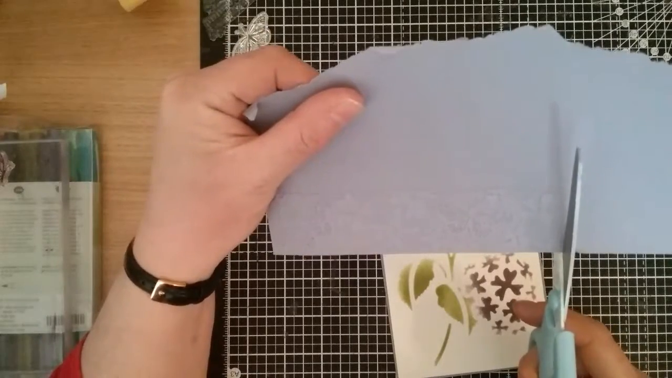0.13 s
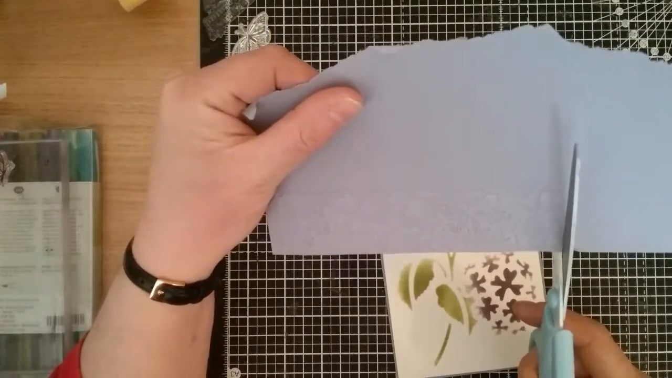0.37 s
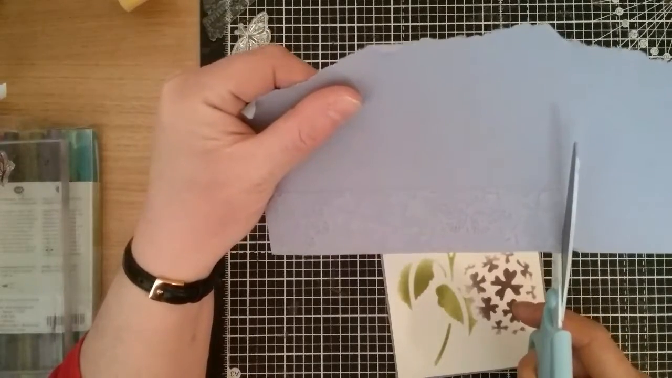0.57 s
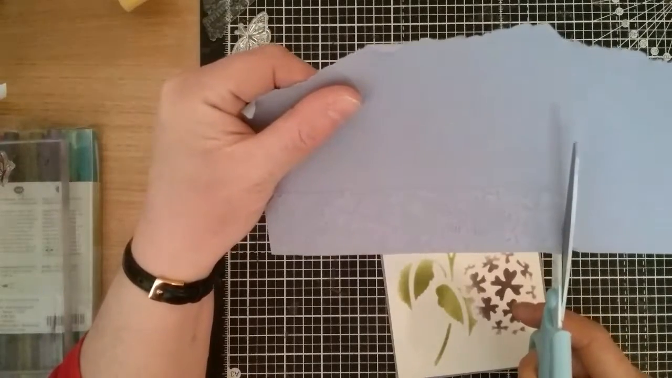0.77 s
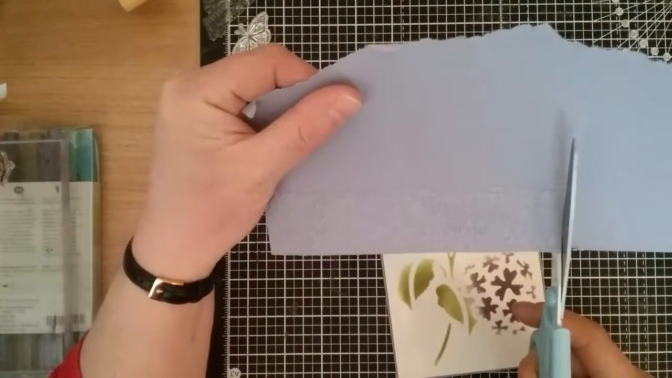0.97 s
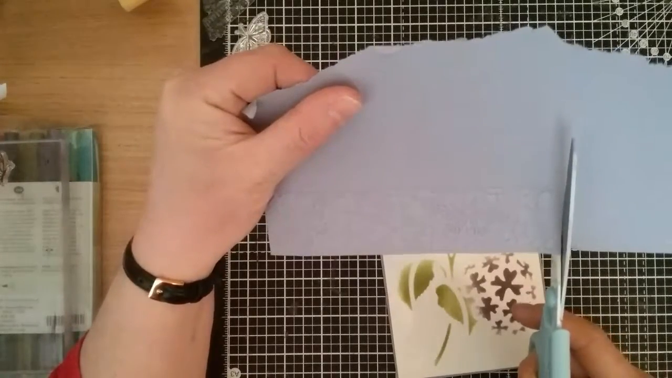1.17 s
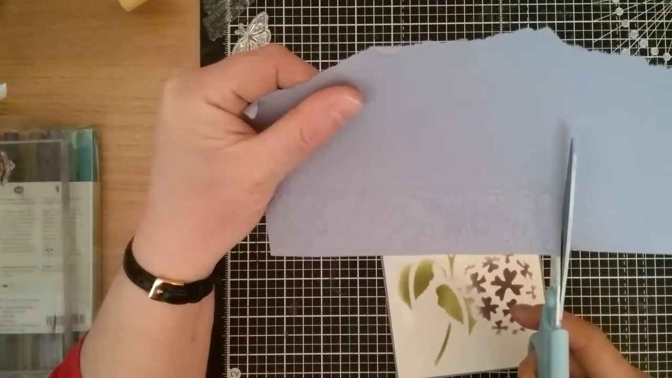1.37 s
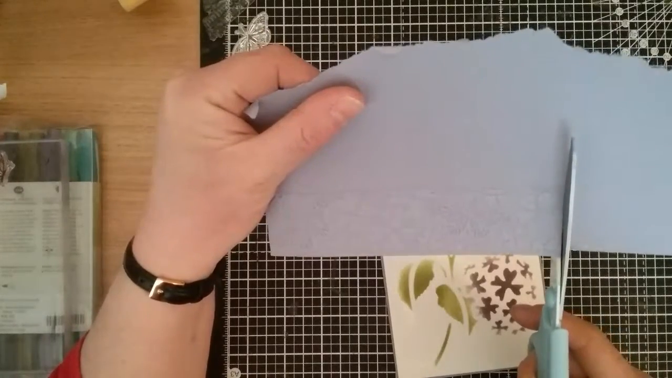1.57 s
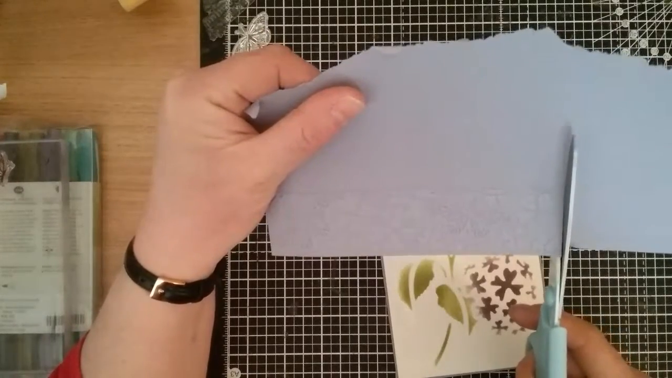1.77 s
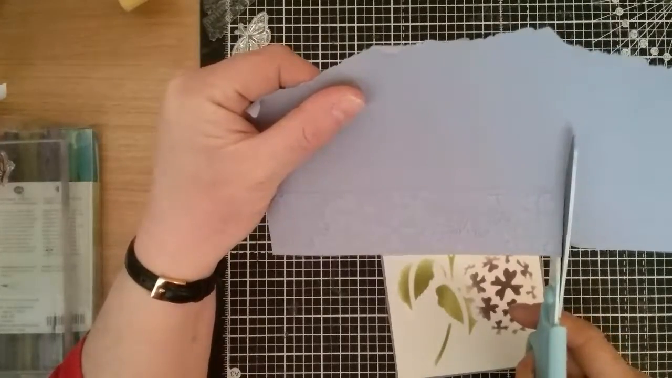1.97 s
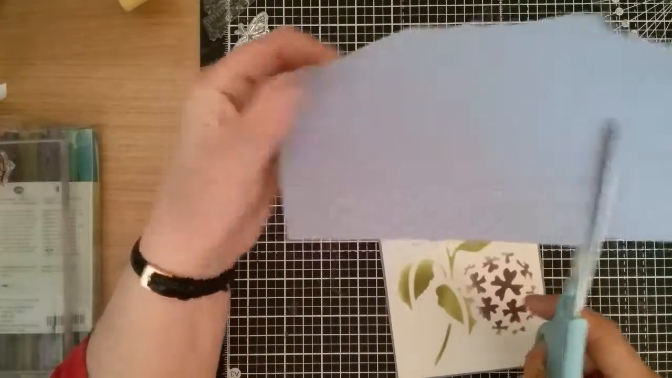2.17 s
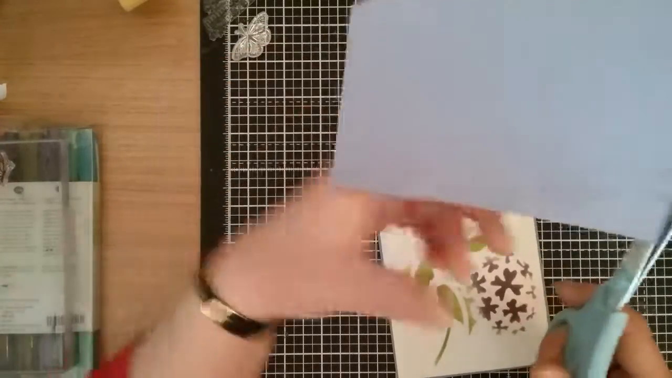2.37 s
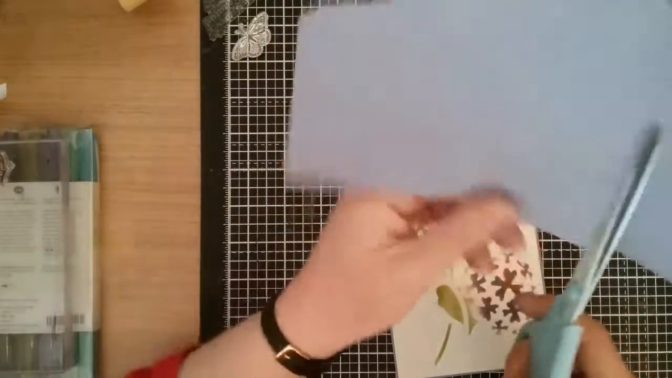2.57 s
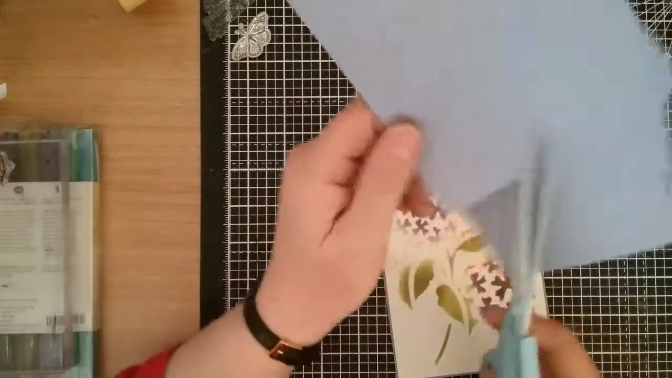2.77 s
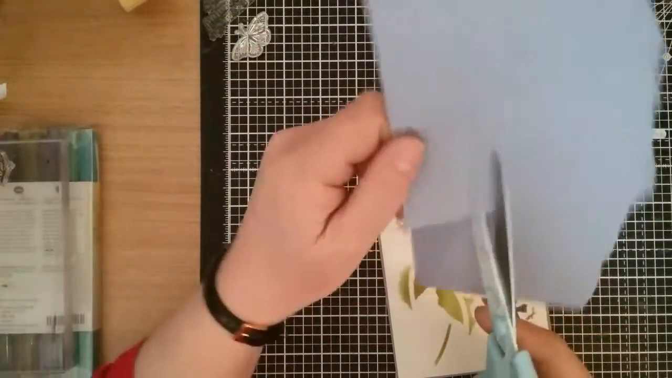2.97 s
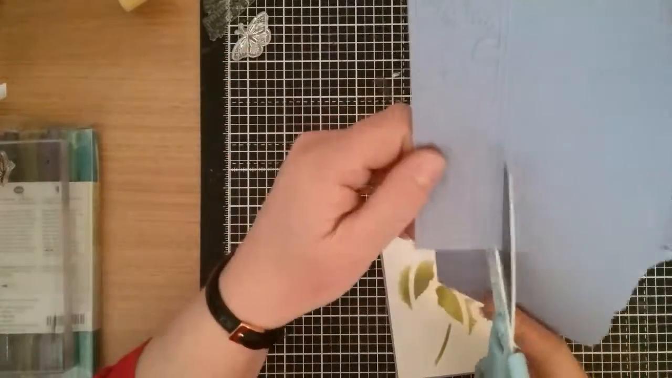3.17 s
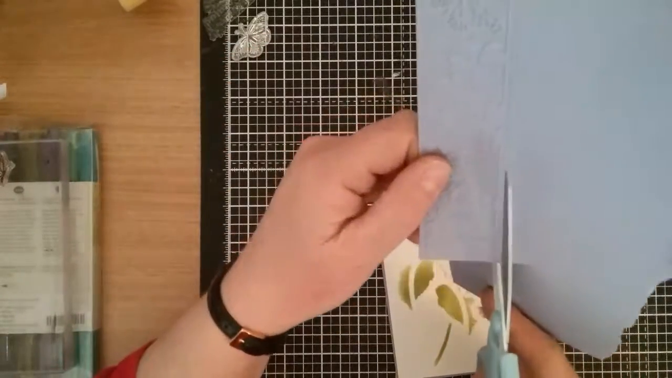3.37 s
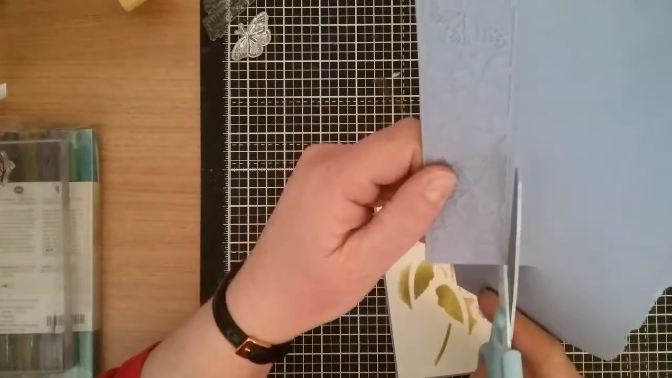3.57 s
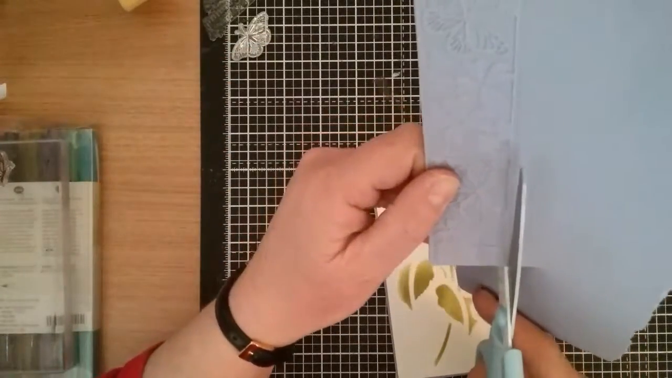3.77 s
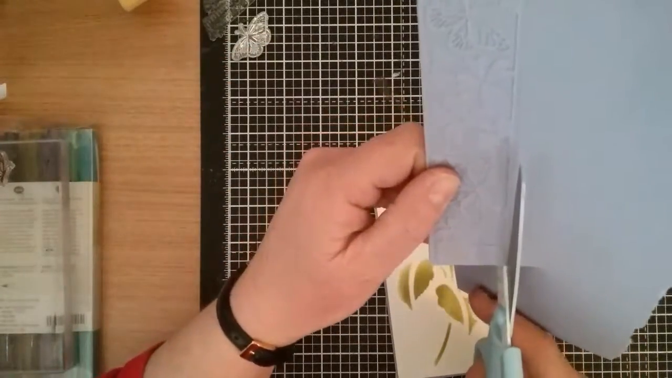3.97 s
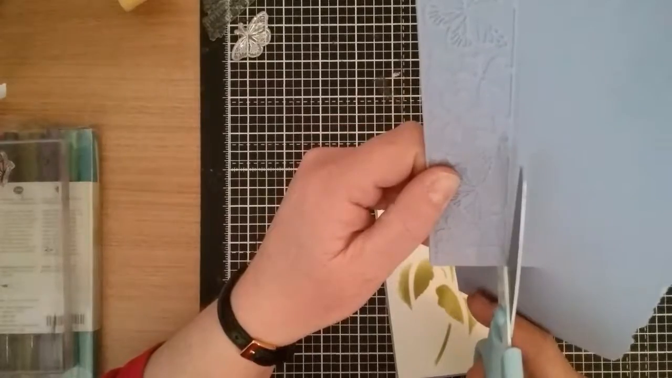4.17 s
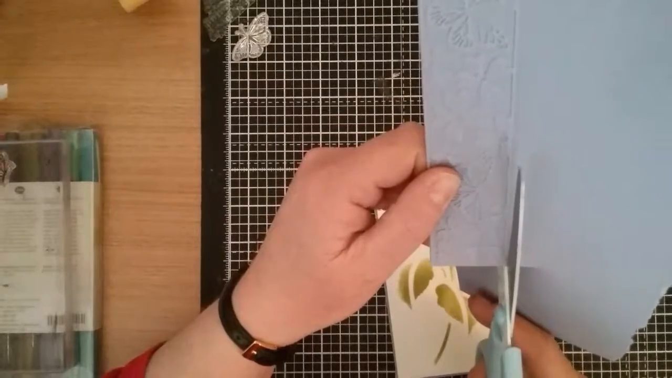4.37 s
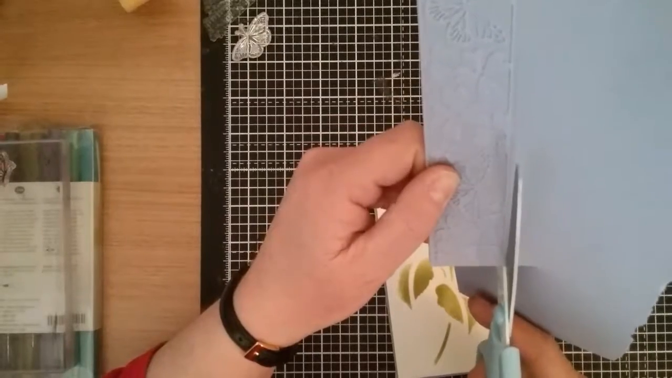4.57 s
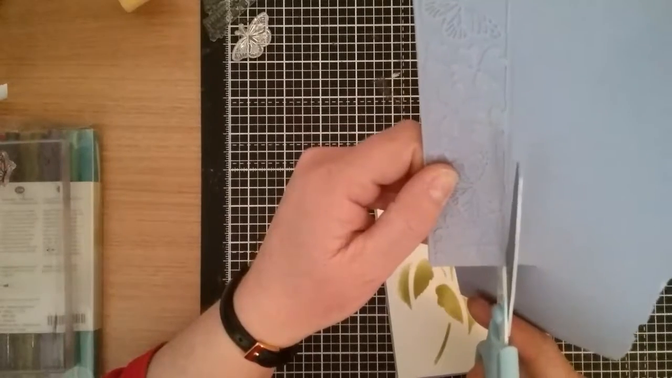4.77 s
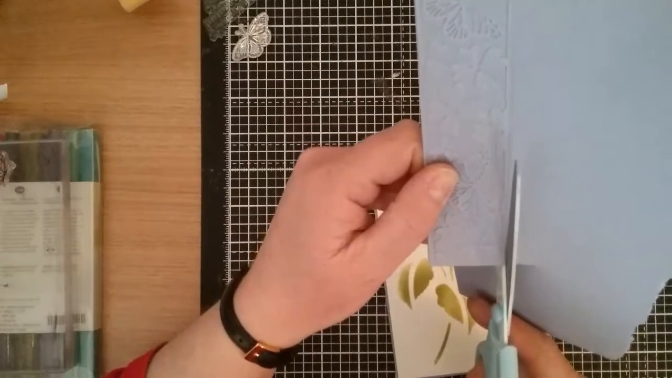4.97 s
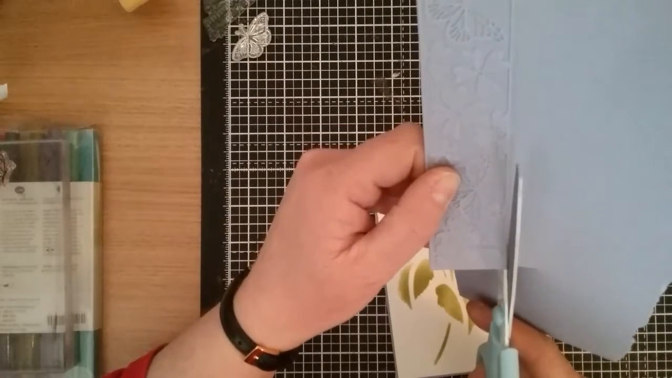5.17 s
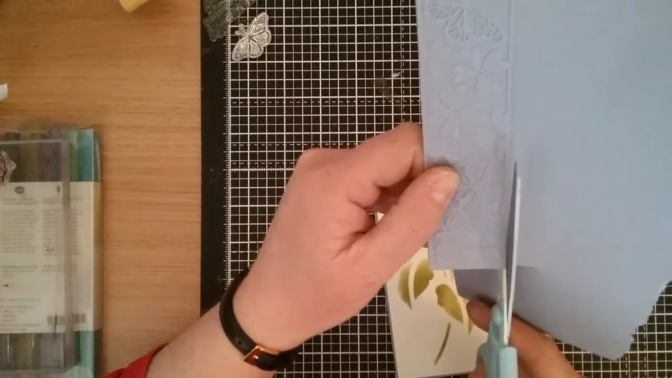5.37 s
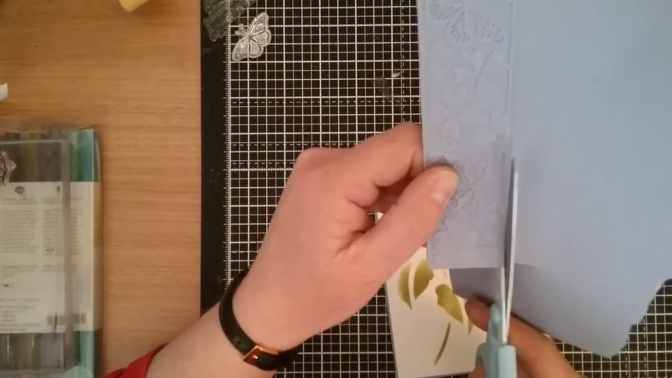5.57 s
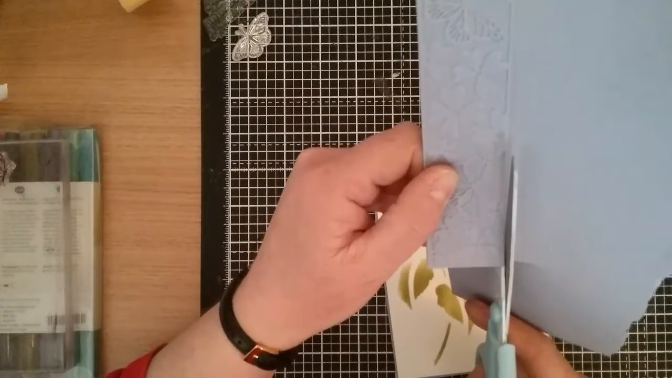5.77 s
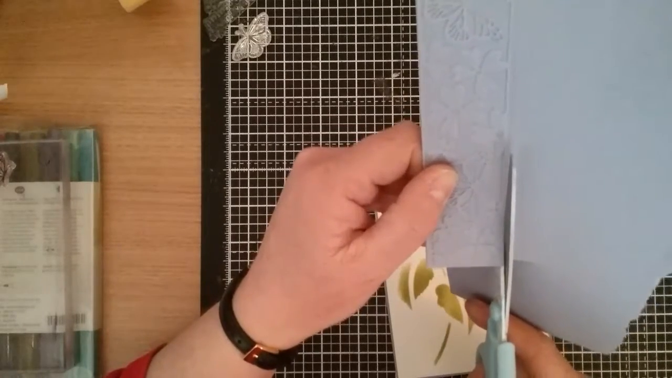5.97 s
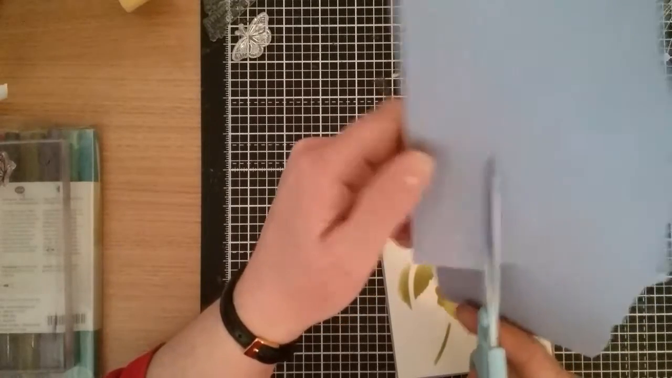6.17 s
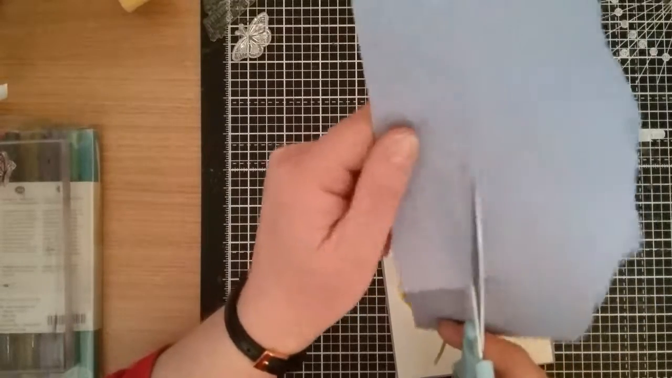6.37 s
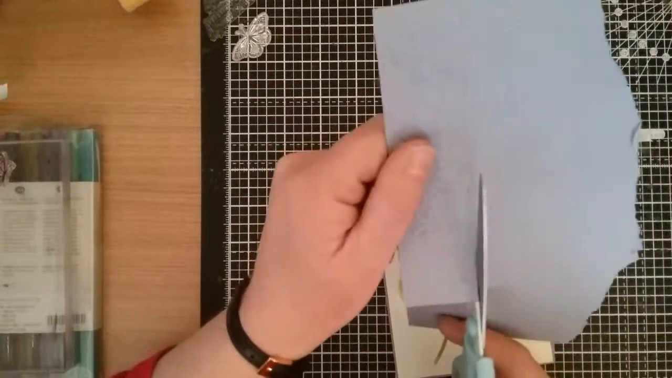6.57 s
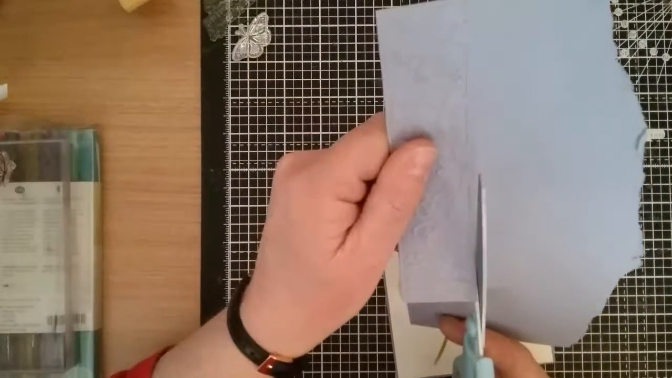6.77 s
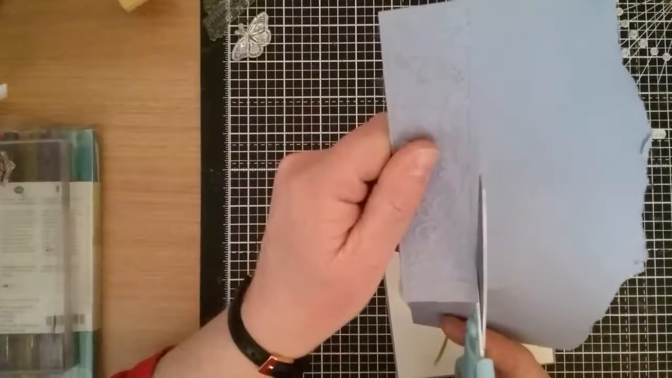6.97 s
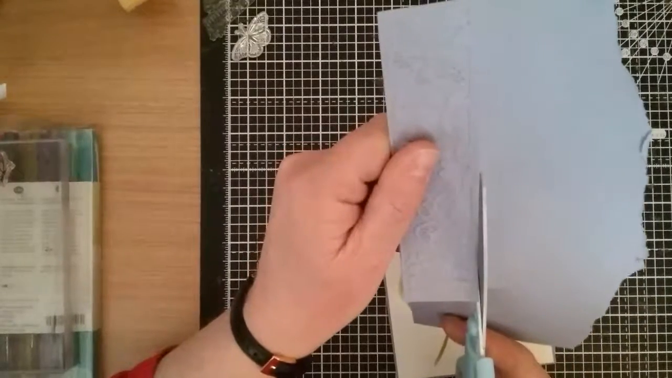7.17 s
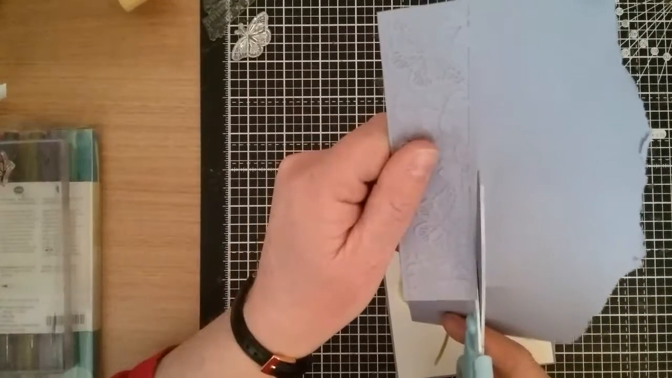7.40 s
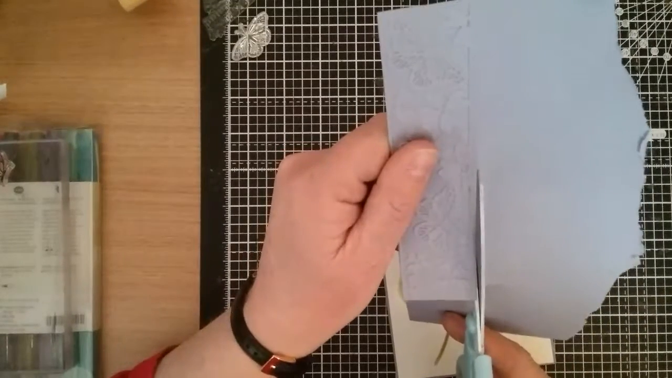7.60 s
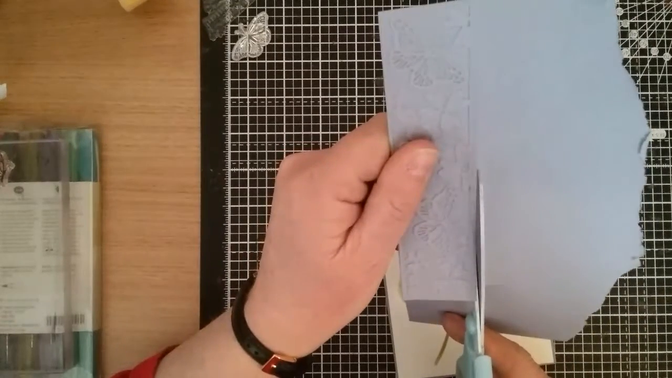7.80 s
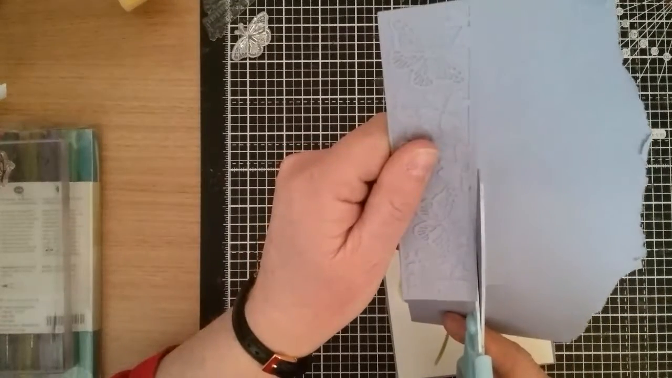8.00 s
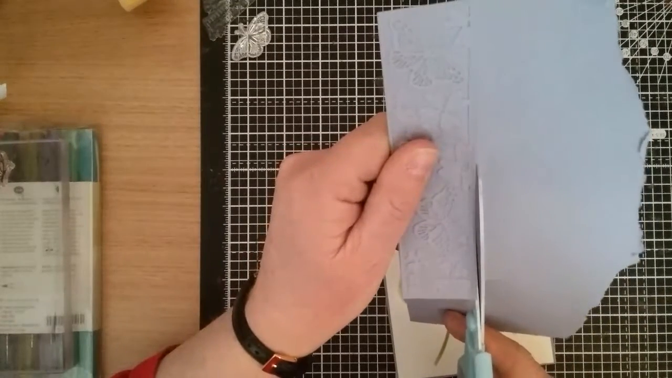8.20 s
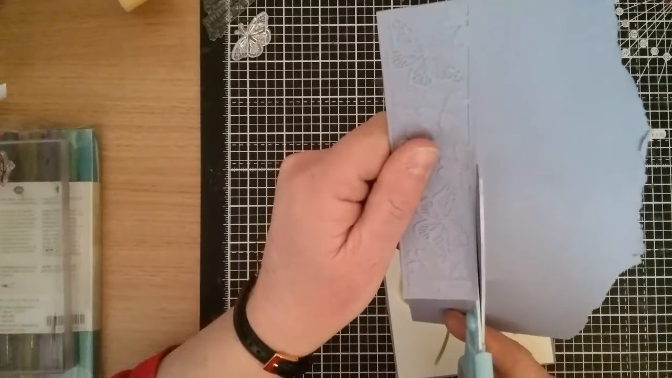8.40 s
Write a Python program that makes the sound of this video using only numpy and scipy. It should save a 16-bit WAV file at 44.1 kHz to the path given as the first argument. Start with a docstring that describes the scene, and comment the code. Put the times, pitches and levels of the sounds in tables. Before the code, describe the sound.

Close, crisp snips through thick paper, a flapping rustle as it is repositioned, then more cutting in a quiet, faintly humming, whining room.

```python
"""Scissors work slowly through a sheet of cardstock above a desk in a quiet room.
Each bite is a short crunch of fibre clicks that sounds at the edge, rings the blades and moves the sheet.
Between cuts the turned sheet snaps, thumps and slides: click bursts, decaying sines and shaped friction grain.
Desk reflections and a short tail surround it; hum, a thin whine and coloured noise run throughout."""
import sys
import numpy as np
from scipy import signal
from scipy.fft import rfft, irfft
from scipy.io import wavfile

SR = 44100
rng = np.random.default_rng(int(sys.argv[2]) if len(sys.argv) > 2 else 0)


def dump(signal):
    """Clip the signal to [-1, 1] and save it as 16-bit WAV at the path in sys.argv[1]."""
    limited = np.clip(np.atleast_2d(signal).T, -1, 1)
    pcm = np.round(limited * 32767).astype(np.int16)
    wavfile.write(sys.argv[1], SR, pcm)


N = 372204
TIME = np.arange(N) / SR

# Strong bites of the blades through the card, levels before the layer trims:
# [t/s, crunch level/dB, sheet response above the crunch/dB]
BITES = [(0.523, -49, -28), (0.602, -44.5, -20), (0.654, -49.5, -23), (0.688, -50, -26),
         (0.733, -51.5, -20), (0.812, -48, -25), (0.855, -41, -31), (0.886, -48, -32),
         (0.914, -39.5, -12.5), (0.982, -46, -33), (1.1775, -47.5, -14), (1.209, -41.5, -17),
         (1.244, -44.5, -6), (1.276, -46.5, -21), (1.3747, -44.5, -8), (1.397, -47, -8),
         (1.507, -31.5, -19), (1.554, -43, -10.5), (1.655, -40, -4.5), (1.698, -41, -9),
         (1.7446, -44.5, -3.5), (1.792, -40, -10.5), (1.918, -41.5, -3), (2.045, -43.5, -0.5),
         (2.089, -44.5, 3.5), (4.509, -43, -8.5), (4.547, -43, -13), (4.649, -42.5, -20), (4.772, -44, -15),
         (4.938, -43, -29), (5.116, -46.5, -9), (5.211, -44.5, -8), (5.267, -39.5, -13), (5.32, -36.5, -29),
         (5.391, -40, -16), (5.5596, -50.5, 3.5), (5.757, -36.5, -4.5), (5.7817, -40, -10),
         (5.828, -35, -10), (5.872, -39, -10), (5.931, -43, -11), (5.963, -36.5, -6), (7.166, -48, -10),
         (7.213, -44.5, -11), (7.268, -39.5, -11), (7.311, -35, -9), (7.3364, -39, -22), (7.369, -43, -16),
         (7.4637, -40, -8.5), (7.514, -40.5, -12), (7.692, -40.5, -9.5), (7.728, -43, -9),
         (7.86, -41.5, -11), (7.947, -47, -3), (8.0393, -33.5, -9), (8.074, -35.5, -6), (8.203, -36.5, -4),
         (8.2364, -43.5, -6), (8.255, -39, -6), (8.316, -39, -5)]
# Stretches of cutting, each with its own grip on the sheet, levels before the layer trims:
# [start t/s, end t/s, faint bite level/dB, nominal main bending mode f/Hz, flexing above the sheet response/dB]
CUTS = [(0.052, 1.39, -54, 576, -4.5), (1.376, 2.12, -51.5, 253.5, 1.5), (4.442, 5.6, -48.5, 700, -9),
        (5.66, 6.02, -59, 610, -32), (7.147, 8.35, -61, 597, -5)]
# Card sliding over blades and fingers and bending as it goes, levels before the layer trims:
# [start t/s, attack/s, hold/s, release/s, hiss level/dB, sheet response above the hiss/dB, dull rustle level/dB]
MOVES = [(1.902, 0.014, 0.017, .1, -63.5, 5, -68), (2.098, 0.084, 0.01, 0.017, -52, -4.5, -72),
         (2.208, .015, 0.13, .05, -60.5, 6.5, -59), (2.314, 0.055, 0.034, 0.1, -59, 5.5, -47.5),
         (2.514, 0.037, 0.079, 0.061, -62.5, 3, -63), (2.582, .004, 0.0036, 0.028, -55, 7, -42),
         (2.615, 0.029, .007, 0.046, -47.5, 4, -55), (2.651, .015, .1, 0.051, -57.5, 7, -77),
         (2.776, .02, .005, 0.13, -56, 5, -51.5), (2.896, 0.033, 0.1, .05, -58.5, 7.5, -52.5),
         (3.01, 0.082, 0.057, 0.35, -55.5, 5.5, -54), (3.3, 0.26, 0.02, 0.044, -58, 1.5, -64),
         (3.655, 0.045, 0.0057, 0.087, -61, 1.5, -57.5), (3.868, 0.032, 0.036, 0.17, -58.5, -4, -69),
         (4.229, 0.052, 0.022, 0.17, -56.5, -4.5, -76), (4.422, .025, .005, 0.056, -68, -6, -59),
         (4.56, 0.045, 0.11, 0.56, -65.5, -3.5, -66), (4.913, 0.082, 0.034, 0.13, -60, -6.5, -74),
         (5.311, 0.084, .005, 0.15, -59, -3, -81), (6.071, 0.028, 0.051, .04, -63, 0.5, -79),
         (6.151, 0.033, 0.0044, 0.016, -50, 2.5, -66), (6.214, 0.0085, 0.092, 0.061, -66, 2.5, -70),
         (6.339, .015, 0.07, 0.12, -64.5, 4, -54.5), (6.433, .035, 0.013, 0.042, -49.5, 3.5, -62),
         (6.489, .02, 0.033, 0.03, -56, 3, -59), (6.594, 0.026, 0.019, 0.054, -64.5, -7, -81),
         (6.777, 0.073, .015, .09, -68, 4.5, -71)]


def amp(db):
    """Converts decibels to a linear gain."""
    return 10 ** (np.asarray(db) / 20)


def unit(x):
    """Scales a signal to rms 1."""
    return x / np.sqrt(np.mean(x ** 2) + 1e-20)


def add(mix, s, sound):
    """Lays a sound into the mix at time s, cut off at the mix's end."""
    part = mix[max(round(s * SR), 0):][:len(sound)]
    part += sound[:len(part)]


def colour(x, points, size=4096):
    """Filters with a causal minimum-phase response of unit energy, shaped by (f/Hz, level/dB) points."""
    hz, db = np.transpose(points)
    bin_hz = abs(np.fft.fftfreq(size, 1 / SR))
    gain = amp(np.interp(np.log(bin_hz + 1), np.log(hz), db))
    spectrum = np.exp(np.conj(signal.hilbert(np.log(gain))))
    taps = np.fft.ifft(spectrum).real[:size // 2]
    return signal.oaconvolve(x, taps / np.linalg.norm(taps))[:len(x)]


def resonate(x, hz, width_hz):
    """Rings a resonance of unit energy whose pitch follows the curve hz."""
    turn = np.exp(2j * np.pi * np.cumsum(hz * np.ones(N)) / SR)
    r = np.exp(-np.pi * width_hz / SR)
    gain = np.sqrt(2 * (1 - r * r) ** 3 / (1 + r * r))
    # shift the moving pitch to 0 Hz, smooth with a double pole, shift back
    smooth = signal.lfilter([1], [1, -2 * r, r * r], x / turn)
    return gain * (turn * smooth).real


def drift(rate_hz):
    """Makes a random wander of rms 1, its spectrum falling off around rate_hz."""
    step = 64
    coarse = TIME[::step]
    hz = np.fft.rfftfreq(len(coarse), step / SR)
    noise = rfft(rng.standard_normal(len(coarse)))
    slow = irfft(noise * np.exp(-(hz / rate_hz) ** 2), len(coarse))
    return unit(np.interp(TIME, coarse, slow))


def fibres(per_s, spread_db):
    """Scatters tiny clicks of paper fibres at random times, polarities and sizes, at rms 1."""
    size = amp(spread_db * np.minimum(rng.exponential(1, N), 4))
    polarity = rng.choice([-1., 1.], N)
    breaks = rng.random(N) < per_s / SR
    return unit(size * polarity * breaks)


def gesture(start, attack, hold, release):
    """Gives start time and gain of one hand movement: it gathers speed, holds, and dies away."""
    release_db = -23  # fall over one release time
    t = TIME[:SR]
    rise = np.sin(np.pi / 2 * np.minimum(t / attack, 1))
    fall = amp(release_db * np.maximum(t - attack - hold, 0) / release)
    return start, rise * fall


def effort(rows, levels_db):
    """Joins several movements into one gain curve by adding their powers."""
    power = np.zeros(N)
    for row, db in zip(rows, levels_db):
        start, gain = gesture(*row[:4])
        add(power, start, (amp(db) * gain) ** 2)
    return np.sqrt(power)


def stroke(s, db):
    """Draws a gain curve through the given points, silent outside them."""
    return amp(np.interp(TIME, s, db, left=-np.inf, right=-np.inf))


def snips(edge_db=-8, sheet_db=-8, sheet_lag=1.32):
    """Each bite swells as fibres break, then dies; the sheet dies a little more slowly."""
    rise_s, bite_s = .0042, .0091
    edge, sheet = np.zeros(N), np.zeros(N)
    t = TIME[:SR // 8]
    swell = 1 - np.exp(-(t / rise_s) ** 2)
    age = t / bite_s
    for s, db, body_db in BITES + faint_bites():
        start = s - rise_s / 2
        add(edge, start, amp(db + edge_db) * swell / (1 + age ** 3))
        add(sheet, start, amp(db + body_db + sheet_db) * swell / (1 + (age / sheet_lag) ** 3))
    return fibres(per_s=8000, spread_db=0.0) * np.array([edge, sheet])


def faint_bites(spread_db=2, jitter=.25):
    """Between the strong bites the blades creep on in small, nearly regular slips."""
    bites_per_s = 21
    sheet_response_db = -24  # faint bites hardly move the sheet
    strong = np.array(BITES)[:, 0]
    rows = []
    for start, end, db, _, _ in CUTS:
        for k, (late, size) in enumerate(rng.standard_normal((48, 2))):
            s = start + (k + jitter * late) / bites_per_s
            clear = np.min(abs(strong - s)) > .5 / bites_per_s
            if 0 < s < end and clear:
                rows.append((s, db + spread_db * size, sheet_response_db))
    return rows


def radiate(edge, sheet, blade_db=-5, direct_db=-2, coupling=0.1):
    """Clicks sound directly at the cutting edge, ring the blades and spread through the sheet."""
    # Colour of the radiating sheet: [f/Hz, level/dB]
    sheet_colour = [(60, -53), (130, -29), (230, -2), (430, -0.5), (630, 2), (750, -3), (870, 6.5),
                    (1080, -7), (1400, 3.5), (1740, -3.5), (2030, -1), (2400, -0.5), (3200, -5),
                    (5000, -17.5)]
    # Colour of the cutting edge: [f/Hz, level/dB]
    edge_colour = [(600, -4), (2000, -15.5), (2850, -6.5), (3650, -5.5), (4350, -5.5), (4850, -3),
                   (5500, 5.5), (6050, 4), (6700, -8), (7500, -9.5), (9000, -17), (12000, -20.5),
                   (15000, -49.5)]
    # Main blade resonance, wandering over the cuts: [t/s, f/Hz]
    blade_pitch = [(0.8, 5850), (2.5, 6020), (5.9, 5890), (7.3, 6100), (8.1, 6030)]
    # Resonances of blades and card, centre pitch and mean level: [f/Hz, width/Hz, level/dB]
    resonances = [(1708, 245, -12), (1380, 79, -51), (2690, 87, -31), (3660, 150, -18.5), (4307, 450, -15)]
    blade = resonate(edge, np.interp(TIME, *np.transpose(blade_pitch)), width_hz=960)
    ring = np.zeros(N)
    for hz, width, db in resonances:
        # each resonance shifts and comes and goes as the card bends
        moving_hz = hz * (1 + .035 * drift(rate_hz=14))
        strength = amp(db + 2 * drift(rate_hz=16))
        ring += strength * resonate(sheet + coupling * edge, moving_hz, width)
    direct = colour(edge, edge_colour) + colour(sheet, sheet_colour)
    return amp(direct_db) * direct + amp(blade_db) * blade + ring


def bite_blows(lag_s=0.00304, knee_db=-45, wander=0.072):
    """Each strong bite kicks the sheet near the pitch the grip sets; the hand damps the hardest kicks."""
    grips = 1 + wander * rng.standard_normal(len(BITES))
    blows = []
    for start, end, _, hz, flex_db in CUTS:
        for (s, db, body_db), grip in zip(BITES, grips):
            if start <= s < end:
                kick_db = min(db + body_db, knee_db) + flex_db
                blows.append((s + lag_s, kick_db, hz * grip))
    return blows


def bumps(level_db=-7):
    """Each blow rings the sheet's bending modes, whose spacing shifts with the grip."""
    # Hands knocking the sheet as they move it, levels before the trim: [t/s, level/dB, main bending mode f/Hz]
    knocks = [(2.22, -42.5, 550), (2.29, -42.5, 354), (2.587, -31, 317), (2.642, -38.5, 223),
              (2.796, -40, 626), (3.022, -51, 335), (6.549, -42, 191), (8.262, -46, 289)]
    # Bending modes of the held sheet: [nominal multiple of the main mode, level/dB, t60/s]
    modes = [(.8, 4, 0.028), (1, 6.5, 0.077), (1.38, -6, 0.071), (2.2, -1.5, 0.024)]
    out = np.zeros(N)
    t = TIME[:SR // 4]
    onset = 1 - np.exp(-t / .0015)
    blows = knocks + bite_blows()
    grips = rng.standard_normal((len(blows), len(modes)))
    for (s, db, hz), grip in zip(blows, grips):
        for (ratio, mode_db, t60), g in zip(modes, grip):
            mode_hz = hz * (ratio + .15 * (ratio - 1) * g)
            decay = amp(db + level_db + mode_db - 60 * t / t60)
            add(out, s, decay * onset * np.sin(2 * np.pi * mode_hz * t))
    return out


def snaps(edge_db=-7, sheet_db=-6, click_db=9):
    """A buckle of the sheet starts with one sharp click and crackles away exponentially."""
    # Snaps of the buckling sheet, levels before the trims:
    # [t/s, level/dB, crisp edge above the level/dB, decay time constant/s]
    buckles = [(2.22, -34, -1, 0.0037), (2.285, -43, -1, 0.0065), (2.355, -34, -12, 0.0041),
               (2.365, -34, -13, 0.004), (2.398, -35.5, -2.5, 0.011), (2.587, -36.5, 5.5, 0.0035),
               (2.625, -29.5, -9, 0.0085), (2.639, -34.5, 0, 0.0064), (2.795, -37.5, -7, 0.0066),
               (2.812, -49.5, -14, 0.0074), (6.229, -34.5, -3, 0.0037), (6.353, -38, -11, 0.0046)]
    drive = np.zeros((2, N))  # edge, sheet
    t = TIME[:SR // 8]
    crackle = fibres(per_s=8200, spread_db=0.0)
    for s, db, crisp_db, decay in buckles:
        burst = crackle[round(s * SR):][:len(t)] * np.exp(-t / decay)
        burst[0] = amp(click_db)
        add(drive[0], s, amp(db + crisp_db + edge_db) * burst)
        add(drive[1], s, amp(db + sheet_db) * burst)
    return drive


def slides(hiss_db=1.5, sheet_db=-2, catch_db=2):
    """Sliding friction: fine dense grain that catches unevenly, with scattered coarser ticks."""
    db, body_db, _ = np.transpose(MOVES)[4:]
    edge = effort(MOVES, db + hiss_db)
    sheet = effort(MOVES, db + body_db + sheet_db)
    grain = fibres(per_s=14000, spread_db=-0.5) * amp(catch_db * drift(rate_hz=50))
    ticks = amp(-8) * fibres(per_s=110, spread_db=2.5)
    return unit(grain + ticks) * np.array([edge, sheet])


def bends(level_db=-7, shift=0.13):
    """Crinkles excite the sheet's low resonances, which move as it bends and swings."""
    # Scrape of the sheet swinging round, falling in pitch: [t/s, resonance f/Hz, level/dB]
    swing = [(2.68, 1480, -70), (2.73, 1340, -61), (2.77, 1340, -56), (2.80, 1060, -58), (2.819, 770, -47),
             (2.85, 676, -65)]
    grain = fibres(per_s=1300, spread_db=1)
    gain = effort(MOVES, [row[-1] for row in MOVES])
    low = np.zeros(N)
    # centre f/Hz, width/Hz, level/dB
    for hz, width, db in [(204.5, 160, 2.5), (330, 81, -0.5), (555, 360, 2.5)]:
        moving_hz = hz * (1 + shift * drift(rate_hz=2.8))
        low += amp(db) * resonate(grain, moving_hz, width)
    s, hz, db = np.transpose(swing)
    scrape = stroke(s, db) * resonate(grain, np.interp(TIME, s, hz), width_hz=240)
    return amp(level_db) * gain * low + scrape


def rubs(level_db=-3, catch_db=3):
    """As the blades close, steel creeps over steel with an uneven, grainy hiss."""
    # Rubs of the closing blades, levels before the trim: [start t/s, attack/s, hold/s, release/s, hiss level/dB]
    closings = [(0.037, 0.13, 0.027, 0.21, -70), (0.808, 0.13, .02, 0.042, -65.5),
                (5.672, 0.014, 0.057, .4, -60), (7.119, 0.059, 0.031, .12, -58.5),
                (7.5, 0.045, .015, 0.06, -59.5)]
    # Colour of the blades' own narrow hiss: [f/Hz, level/dB]
    steel_colour = [(3500, -8.5), (5200, -9), (6050, 1.5), (7000, -10), (7900, -15.5), (8800, -34),
                    (15000, -36)]
    gain = effort(closings, [row[-1] for row in closings])
    grain = unit(fibres(per_s=3600, spread_db=6) * amp(catch_db * drift(rate_hz=54)))
    return amp(level_db) * colour(grain * gain, steel_colour)


def room(x, wet_db=-9, t60=0.17, desk_db=-10):
    """A few quick reflections come off the desk, with the short sparse tail of a small room."""
    t = TIME[:SR // 2]
    echoes = rng.standard_normal(len(t)) * (rng.random(len(t)) < .1)
    tail = echoes * amp(-60 * t / t60) * (t > .005)
    taps = amp(wet_db) * tail / np.linalg.norm(tail)
    # delay/s, level before desk_db/dB
    for delay, db in [(.0017, -9.5), (.0031, -25.5), (.0074, -9)]:
        add(taps, delay, amp([desk_db + db]))
    return x + signal.oaconvolve(x, taps)[:N]


def electrics(hum_db=-49.0):
    """A steady mains hum, and a whine that wanders slightly and ripples at twice the hum's frequency."""
    hum_hz, whine_hz, whine_db = 120.0, 13221.8, -53.2
    mains = 2 * np.pi * hum_hz * TIME
    turns = np.cumsum(whine_hz + 1.6 * drift(rate_hz=4)) / SR
    level = amp(whine_db + .15 * drift(rate_hz=40))
    ripple = 1 + .035 * np.cos(2 * mains)
    whine = level * np.sin(2 * np.pi * turns) * ripple
    return np.sqrt(2) * (amp(hum_db) * np.sin(mains) + whine)  # levels are rms


def air(level_db=-64.5):
    """Room and microphone noise: steady white noise through a fixed colour."""
    # Colour of the noise: [f/Hz, level/dB]
    air_colour = [(20, -25), (48, -1.5), (70, 2), (110, 10.5), (160, 7), (260, 0), (500, -3.5),
                  (1000, -9.5), (2000, -10.5), (3700, -16), (6200, -13.5), (9000, -20.5), (13000, -17.5),
                  (15000, -26.5)]
    return amp(level_db) * colour(rng.standard_normal(N), air_colour)


def scene():
    """Scissors and card sound in the room, over electrics and background noise."""
    edge, sheet = snips() + snaps() + slides()
    card = radiate(edge, sheet) + bumps() + bends()
    # a thin sheet radiates no deep bass
    highpass = signal.butter(3, 130, "high", fs=SR, output="sos")
    card = signal.sosfilt(highpass, card)
    return (room(card + rubs()) + electrics() + air())[None]


def record(dry):
    """Limits the band with a steep linear-phase low-pass."""
    cut_hz = 15200
    taps = signal.firwin(511, cut_hz, window=("kaiser", 9), fs=SR)
    return signal.oaconvolve(dry, taps[None], "same")


dry = scene()
out = record(dry)
dump(out)
```